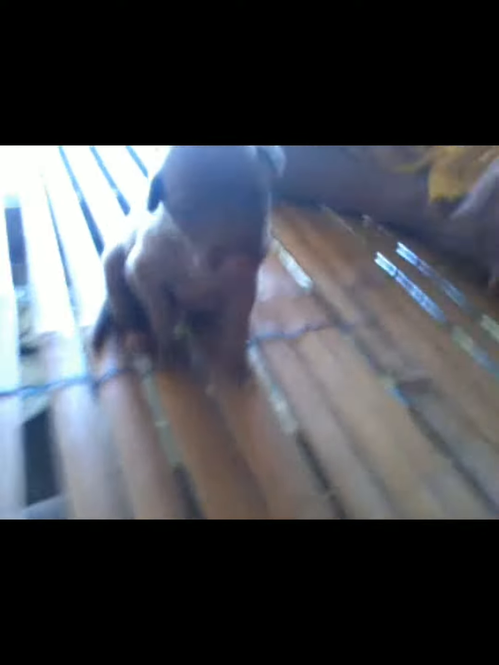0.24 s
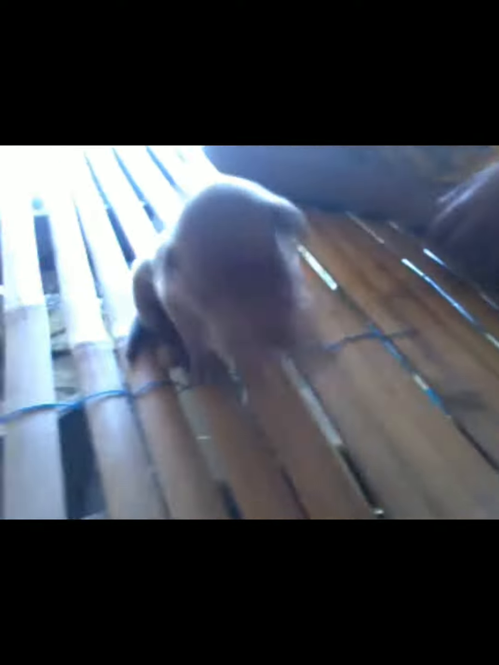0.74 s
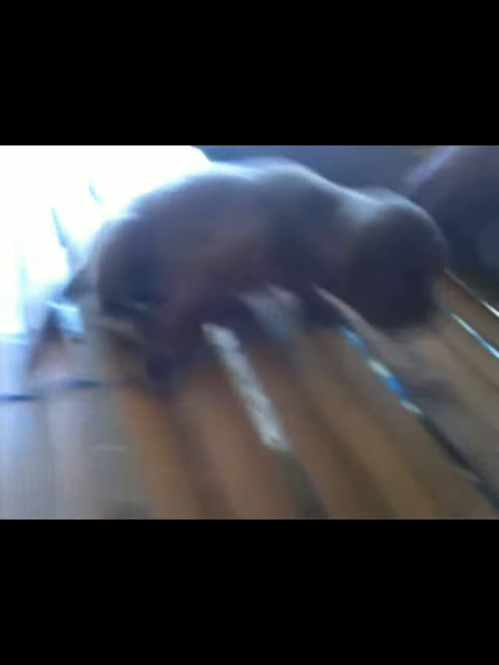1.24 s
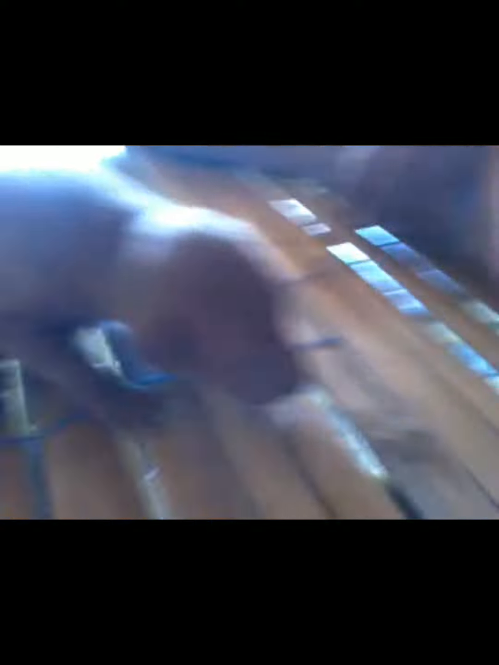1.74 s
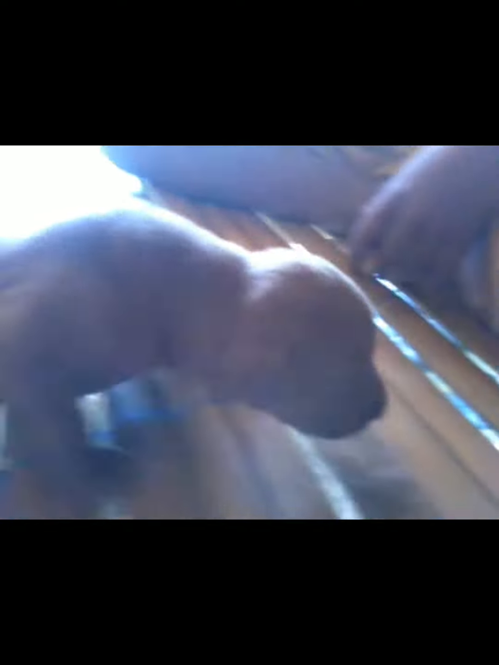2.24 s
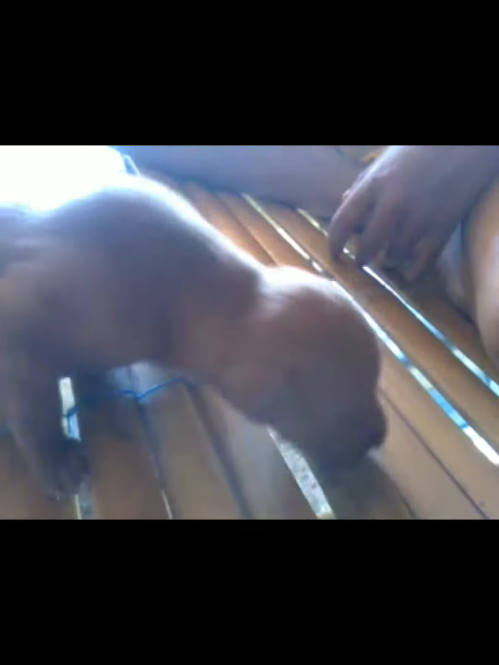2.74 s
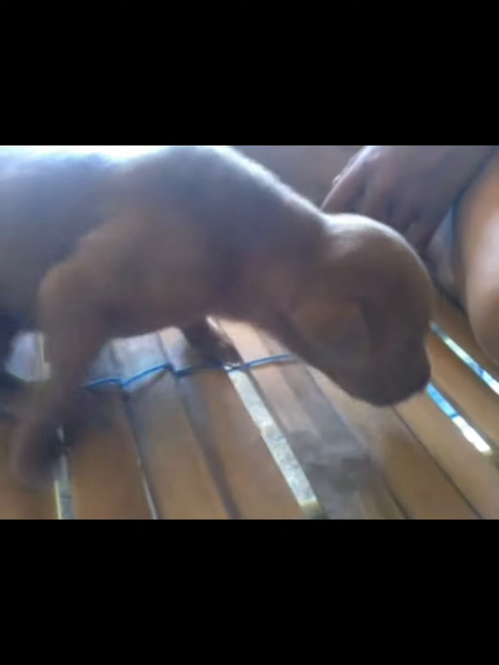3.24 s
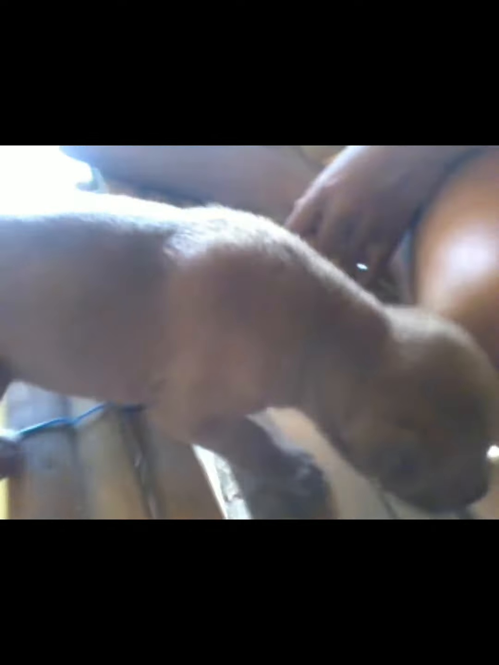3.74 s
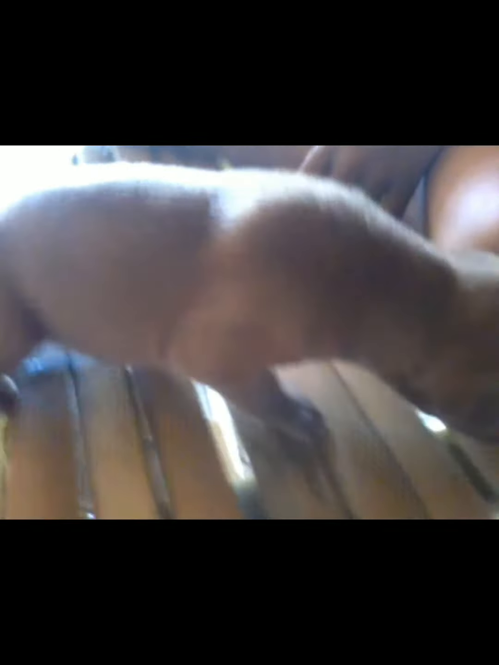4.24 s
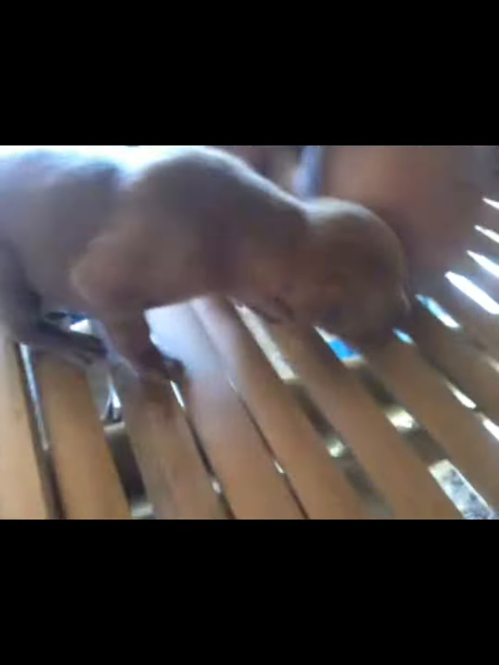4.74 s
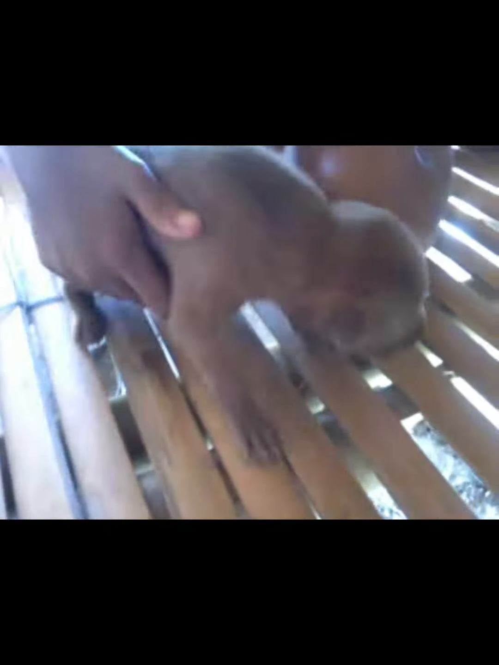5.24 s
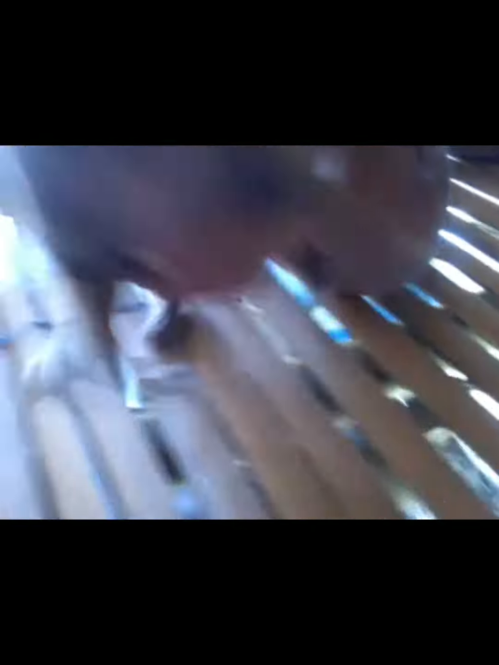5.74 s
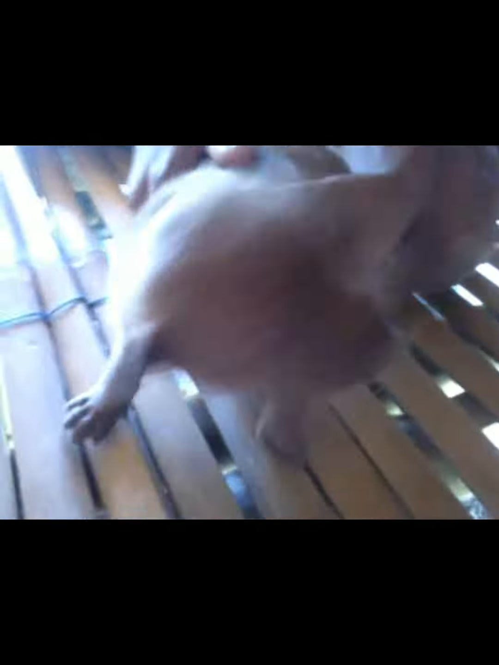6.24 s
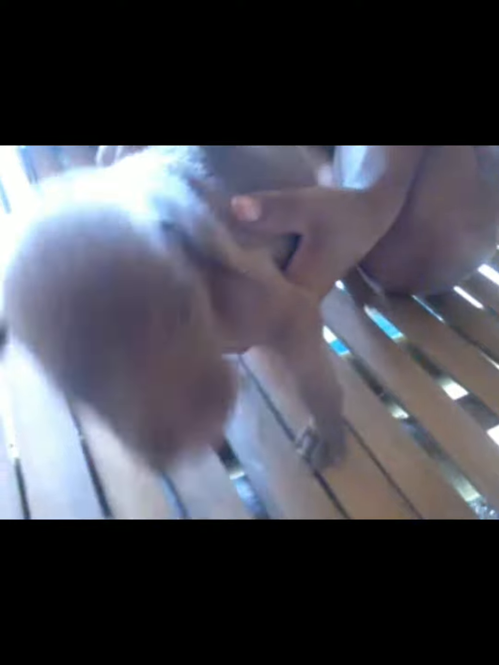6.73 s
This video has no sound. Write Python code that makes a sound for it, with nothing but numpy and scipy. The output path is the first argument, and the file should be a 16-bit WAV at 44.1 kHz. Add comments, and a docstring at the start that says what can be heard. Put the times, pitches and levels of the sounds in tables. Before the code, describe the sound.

Puppies cry on a bamboo slat floor. Quiet gliding whines and tiny regular whimpers come first, with light claw ticks, scrapes and dull bumps; a hard clack lands at two seconds. Louder cries follow in quick succession, each starting with a hoarse bark and rising thin. From five and a half seconds a lifted puppy yelps very close, shrill and clipped. Cheap phone microphone, thin bass, slight hiss, short echo.

```python
"""Puppies on a slatted bamboo floor: one whines long cries, another whimpers and grunts, and a third
yelps right at the phone when lifted and overloads it. Each voice is a stack of partials on a gliding
pitch, shaped by mouth and throat, with irregular folds and breath. Claws tick (ringing noise bursts),
paws scrape (dense clicks) and bodies bump (dull thuds) on the boards, over a steady room background."""
import sys
import numpy as np
from scipy import signal
from scipy.fft import rfft, irfft
from scipy.io import wavfile
from scipy.ndimage import uniform_filter1d

SR = 44100
rng = np.random.default_rng(int(sys.argv[2]) if len(sys.argv) > 2 else 0)


def file_out(sig):
    """Save sig as 16-bit WAV at sys.argv[1]."""
    # one column per channel
    cols = np.atleast_2d(sig).T
    # limit, then scale
    lim = np.clip(cols, -1, 1)
    pcm = np.round(lim * 32767).astype(np.int16)
    wavfile.write(sys.argv[1], SR, pcm)


N = 308700
T = np.arange(N) / SR
PHONE_RATE_HZ = 16000


def undb(db):
    """Amplitude factor of a level in dB."""
    return 10 ** (np.asarray(db) / 20)


def unit(x):
    """Scale to RMS 1."""
    return x / np.sqrt(np.mean(x ** 2))


def band(x, lo_hz, hi_hz):
    """Band-pass with gentle edges."""
    return signal.sosfilt(signal.butter(2, [lo_hz, hi_hz], "bandpass", fs=SR, output="sos"), x)


def flutter(top_hz):
    """Random wavering up to about top_hz, RMS 1."""
    return unit(signal.sosfilt(signal.butter(2, top_hz, fs=SR, output="sos"), rng.standard_normal(N)))


def curve(points):
    """Join (time_s, value) points by straight lines."""
    return np.interp(T, *np.transpose(points))


def log_interp(hz, table):
    """Read a (frequency_hz, gain_db) table on a log frequency axis."""
    table_hz, table_db = np.transpose(table)
    return np.interp(np.log(hz), np.log(table_hz), table_db)


def warble(spells):
    """Pitch factor and level change in dB: the pitch flicks up and the level shifts at each crest."""
    share, change_db = 0, 0
    for first_s, last_s, rate_hz, depth, crest_db in spells:
        on = (T > first_s - .5 / rate_hz) & (T < last_s + .5 / rate_hz)
        crest = on * np.cos(np.pi * rate_hz * (T - first_s)) ** 2
        share = share + depth * (2 * crest - on)
        change_db = change_db + crest_db * crest ** 2
    return 1 + share, change_db


def voice(calls, rough, mouth, press_db, upper_db, breath_db, size, count, waver=(1, 0)):
    """Partials on one pitch; irregular folds shake pitch and strength and let air hiss once a cycle."""
    # throat colour of the upper partials: frequency_hz, gain_db
    throat = [(1000, -8), (2000, -7.5), (2800, -17.5), (3200, -22.5), (4300, -24.5), (5500, -37),
              (7200, -32.5)]
    climb_db = 0.5  # gain per partial above the third
    upper_growth, hiss_growth = 0.13, 0.29  # extra dB per dB of effort
    rasp_hz, rasp_depth = 210, .35  # uneven beating of hoarse folds

    gate = np.zeros(N)
    for call in calls:
        gate[int(call[0][0] * SR):int(call[-1][0] * SR) + 130] = 1
    gate = uniform_filter1d(gate, size=130)

    s, pitch_hz, level_db, tilt_db = np.concatenate(calls).T
    pitch_factor, waver_db = waver
    hz = uniform_filter1d(np.interp(T, s, pitch_hz) * pitch_factor, size=130)
    jitter = .03 * np.sqrt(rough) * flutter(30) + .017 * rough * flutter(160)
    phase = 2 * np.pi * np.cumsum(hz * (1 + jitter)) / SR
    effort_db = uniform_filter1d(np.interp(T, s, level_db), size=200) + waver_db
    tilt_db = uniform_filter1d(np.interp(T, s, tilt_db), size=200)
    below_peak_db = effort_db - effort_db.max()

    # the mouth shapes the low partials; pressed folds change the third and higher
    low = []
    for k in range(1, size + 1):
        db = log_interp(k * hz, mouth) + tilt_db * np.log2(min(k, 3))
        low.append(db - (-climb_db) * max(k - 3, 0) + (k > 2) * press_db)
    low = np.array(low)
    # together the low partials carry the effort level
    levels = list(low + effort_db - 10 * np.log10(np.sum(undb(2 * low), axis=0)))

    # the throat colours the upper partials, which also thin out at high pitch
    upper = effort_db + np.minimum(press_db, 0) / 2 + upper_growth * below_peak_db
    upper = upper + upper_db - 8 * np.log2(hz / 700)
    levels += [upper + log_interp(k * hz, throat) for k in range(size + 1, count + 1)]

    uneven = flutter(50) * np.cos(phase / 2)  # strong-weak cycles: lines halfway between partials
    partials = 0
    for k, db in enumerate(levels, 1):
        shimmer = 1 + .4 * rough * flutter(200) + .8 * rough ** 2 * uneven
        audible = k * hz < PHONE_RATE_HZ / 2
        partials = partials + np.sqrt(2) * undb(db) * shimmer * np.sin(k * phase + k * k) * audible

    air = unit(band(band(rng.standard_normal(N), 600, 8100), 780, 7900)) * (1 + np.cos(phase))
    hiss = undb(breath_db + effort_db + hiss_growth * below_peak_db) * rough * air
    rasp_phase = 2 * np.pi * np.cumsum(rasp_hz * (1 + .3 * flutter(25))) / SR
    rasp = 1 + rasp_depth * rough * np.cos(rasp_phase)
    return gate * rasp * (partials + hiss)


def hoarseness(cries):
    """Long cries open clear, break into a bark, then clear again."""
    # one row per cry: bark_roughness (0-1), hold_s
    barks = [(.3, .14), (.22, .2), (.22, .32), (.75, .07), (.75, .07), (.85, .12), (.75, .06), (.75, .06),
             (.1, .05), (.45, .04)]
    onset_s, fade_s, clear_rough = .03, .08, .06
    points = []
    for cry, (rough, hold_s) in zip(cries, barks):
        s = cry[0][0] + onset_s
        points += [(s - onset_s / 2, clear_rough), (s, rough)]
        points += [(s + hold_s, rough), (s + hold_s + fade_s, clear_rough)]
    return curve(points)


def whines():
    """Long gliding cries whose folds press, bark and warble."""
    # one list per cry: time_s, pitch_hz, level_db, tilt_db_per_octave (mouth opening)
    cries = [
        [(0.0, 877, -28, -4), (0.05, 902, -30, -3.5), (0.082, 911, -23, -7), (0.106, 899, -29, -6.5),
         (0.17, 938, -27, -1), (0.222, 892, -30.5, -9), (0.24, 802, -37.5, -8), (0.266, 692, -40, 5.5),
         (0.32, 564, -56.5, -19)],
        [(0.93, 404, -67, -40), (1.07, 423, -64, -34), (1.09, 412.4, -41, -13), (1.12, 458.5, -33.5, -17),
         (1.155, 504, -35, -7), (1.19, 532, -36.5, -2), (1.23, 569, -38, -3), (1.3, 650, -37.5, -5.5),
         (1.35, 846, -36.5, -5), (1.378, 829, -33, -14), (1.444, 949, -31.5, -3), (1.564, 993, -37.5, -6),
         (1.674, 964, -38, -1), (1.72, 882, -31.5, -5), (1.75, 902, -28, -1), (1.775, 945, -30.5, -3.5)],
        [(2.29, 450, -57, -9), (2.312, 603, -28.5, 6), (2.33, 688, -20.5, 13.5), (2.398, 759, -18, 22.5),
         (2.43, 837, -23, 16.5), (2.45, 1080, -32, 9), (2.476, 946, -20.5, 9.5), (2.49, 1096, -31, 11),
         (2.51, 890, -22, 3), (2.53, 1063, -26, 13), (2.59, 1209, -30.5, 5.5), (2.602, 1017, -26, 17),
         (2.618, 1348, -27, -9), (2.65, 1332, -27, -8), (2.682, 1328, -23, -6), (2.712, 1297, -41, 1.5),
         (2.75, 1180, -33.5, 4), (2.832, 940, -35.5, -2), (2.884, 911, -36, -8), (2.95, 793, -53.5, -10)],
        [(3.308, 449, -48, -14), (3.326, 578.5, -31.5, 2), (3.342, 687, -22.5, 9.5), (3.353, 800, -25, 9),
         (3.361, 920, -17.5, 25), (3.374, 872, -15, 10), (3.39, 883, -18, 16), (3.406, 778.5, -17.5, 17),
         (3.45, 767, -29, 17), (3.474, 969, -26.5, 2), (3.49, 1000, -22.5, 13), (3.52, 978, -22.5, 7.5),
         (3.54, 1024, -20.5, 17.5), (3.592, 1138, -27, 10), (3.604, 1380, -24.5, -6), (3.642, 1378, -31.5, 8.5),
         (3.718, 1375, -38, 1.5), (3.744, 1295, -44, -3), (3.79, 1117, -46, 5)],
        [(3.991, 513, -45, -7), (4.003, 604, -31.5, -1), (4.017, 712.5, -21.5, 15.5), (4.027, 917, -21, 6.5),
         (4.05, 957, -19.5, 5), (4.078, 896, -16.5, 15.5), (4.104, 837.5, -24, 12), (4.12, 957, -27.5, 4.5),
         (4.146, 948, -23, 12), (4.17, 1336, -38.5, 1), (4.188, 1070, -28, 16), (4.22, 1342, -36, 4.5),
         (4.272, 1345, -36, 5), (4.306, 1250, -44.5, 4), (4.345, 1218, -62, -3)],
        [(4.562, 466, -46, -19), (4.572, 580.4, -34, -10), (4.586, 669, -24, 10.5), (4.596, 924, -22, 6),
         (4.62, 1006, -17.5, 17), (4.644, 1013, -20, 11), (4.662, 868, -19, 11.5), (4.678, 817, -26, 9),
         (4.7, 1015, -31, 9.5), (4.734, 1076, -31.5, 5), (4.802, 1087, -32, 8), (4.822, 1341, -26.5, -11),
         (4.9, 1382, -35.5, 0.5), (4.964, 1363, -39, -5), (4.994, 1174, -42, 6.5), (5.04, 1071, -50, 4)],
        [(5.232, 495.5, -33, 14), (5.244, 610, -35, -3), (5.258, 671, -24.5, 8), (5.272, 947, -18.5, 5.5),
         (5.29, 974, -19, 6.5), (5.314, 818, -20.5, 11), (5.35, 739, -30.5, 5), (5.362, 800, -26, -7),
         (5.39, 822, -39.5, -3), (5.404, 919, -29, -8.5), (5.452, 951, -36.5, -2.5), (5.535, 1170, -44.5, 12)],
        [(5.83, 607, -28, 9), (5.85, 940, -18.5, 6), (5.875, 933, -16.5, 10), (5.905, 940, -17.5, 7.5),
         (5.918, 776, -26, 8), (5.952, 763, -31, 8), (5.98, 891, -32, -6)],
        [(6.09, 1070, -44, -35), (6.11, 1026, -27.5, 15), (6.182, 1110, -34, 12), (6.24, 1170, -43.5, 7.5),
         (6.27, 1053, -55, 2)],
        [(6.865, 512, -29, -4), (6.889, 764, -23, 6.5), (6.905, 904, -14.5, 8.5), (6.923, 977, -17.5, 6.5),
         (6.95, 943, -20, 5), (6.983, 978, -31.5, -6), (7.0, 804, -48, -11.5)],
    ]
    # how hard the folds close, acting from the third partial up: time_s, press_db
    fold_press = [(0, -3.5), (0.2, -3), (0.24, -4), (0.27, -7), (0.32, -2), (1.08, -9), (1.16, -1.5),
                  (1.23, -4), (1.29, 7), (1.36, -6), (1.74, -33), (1.76, 16), (2.3, -8), (2.4, -12),
                  (2.44, -36), (2.58, -47), (2.63, 6), (2.75, -9), (2.8, -27.5), (3.1, 19), (3.33, -5),
                  (3.35, -2.5), (3.4, -9.5), (3.44, -9.5), (3.48, -22), (3.55, -38), (3.6, -9.5),
                  (3.79, -6.5), (4.01, -6), (4.035, -0.5), (4.08, -3), (4.12, -16), (4.17, -27), (4.3, 1),
                  (4.58, 3), (4.62, -12), (4.7, -2), (4.81, -12), (4.84, 4), (5.03, -7), (5.25, -5),
                  (5.28, 1.5), (5.31, -1), (5.33, -9), (5.37, 4), (5.45, -5), (5.53, -5), (5.85, -1.5),
                  (5.98, -7), (6.18, -29), (6.25, -14.5), (6.88, 4.5), (6.93, -12), (7, -8)]
    # warbling spells: first_crest_s, last_crest_s, rate_hz, depth (share of pitch), crest_db
    spells = [(0.035, 0.162, 25, .04, -8.5), (1.126, 1.297, 23, .03, -5.5), (3.499, 3.581, 29.7, 0.019, -3),
              (4.695, 4.801, 22, 0.019, -3.5), (4.926, 5.018, 22, 0.019, -4.5)]
    # mouth resonances: frequency_hz, gain_db
    mouth = [(400, -41), (700, -1.5), (1000, 0), (1400, -3.5), (1900, 4), (2300, -9), (2750, -6.5),
             (3200, -26.5), (4000, -16), (5500, -23.5)]
    return voice(cries, hoarseness(cries), mouth, curve(fold_press), upper_db=6,
                 breath_db=-33.5, size=4, count=9, waver=warble(spells))


def swells(events, rise_db_s, stop_s):
    """Each event rises to its level, fades at its own pace and stops."""
    out = 0
    for s, db, fade_db_s in events:
        t = T - s
        fall_db = -fade_db_s * t - rise_db_s * np.maximum(t - stop_s, 0)
        out = out + undb(db + np.where(t < 0, rise_db_s * t, fall_db))
    return out


def clicks(rate_hz, spread_db):
    """Random tiny clicks of uneven size."""
    struck = rng.random(N) < rate_hz / SR
    return struck * undb(spread_db * rng.exponential(size=N)) * rng.standard_normal(N)


def scrape():
    """Paws scraping: dense tiny clicks in the bright band of the slats."""
    # peak_s, level_db, fade_db_per_s
    strokes = [(0.0, -46, 208), (0.2, -61, 28), (0.304, -53.5, 57), (0.45, -51.5, 37), (0.74, -52.5, 64),
               (0.84, -57, 200), (1.1, -43, 125), (1.22, -57.5, 18), (1.42, -52, 98), (1.48, -36.5, 1795),
               (1.51, -52, 50), (1.55, -41, 700), (1.756, -28.5, 652), (2.012, -67, 700),
               (2.035, -40.5, 58), (4.36, -97, 400), (4.45, -73, 1500), (4.72, -46.5, 76),
               (5.038, -48, 500), (5.095, -42.5, 300), (5.18, -63.5, 67), (6.495, -51.5, 400)]
    grains = band(band(clicks(5000, 2.2), 3300, 5700), 3300, 5700)
    return swells(strokes, rise_db_s=2493, stop_s=0.13) * unit(grains)


def bumps():
    """Soft bumps through the floor: dull grainy thuds in the boards' low resonance."""
    # peak_s, level_db, fade_db_per_s
    thuds = [(0.0, -37, 270), (0.106, -38.5, 503), (0.3, -48.5, 700), (0.42, -44, 200), (0.49, -46, 600),
             (0.57, -55.5, 67), (0.625, -54, 600), (0.75, -34, 502), (0.8, -72, 200), (0.9, -60, 102),
             (1.226, -40, 450), (1.454, -45, 150), (1.568, -51, 400), (1.766, -32.5, 324),
             (2.016, -43.5, 46), (2.21, -57, 342), (3.52, -50, 501), (6.39, -49, 902), (6.428, -55, 1203)]
    return swells(thuds, rise_db_s=593.5, stop_s=.15) * unit(band(clicks(600, 2.5), 336, 1070))


def room():
    """Steady background of shaped noise that drifts a little in level."""
    # relative noise spectrum: frequency_hz, density_db
    spectrum = [(88, -39), (150, -35), (242, -52.5), (439, -15.5), (1240, -21), (2800, -17), (3040, -19.5),
                (4370, -21.5), (5700, -23), (7800, -60.5), (10100, -35.5), (17200, -120)]
    shape = undb(log_interp(np.arange(N // 2 + 1) * SR / N + 1, spectrum))
    noise = unit(irfft(rfft(rng.standard_normal(N)) * shape, N))
    return undb(-58.5 + 0.3 * flutter(9)) * noise


def ticks():
    """Claws striking the slats: a short ring of the slat and a crackly tail."""
    # start_s, peak_db, centre_hz, tail_t60_s
    strikes = [(0.046, -33, 3450, 0.24), (0.304, -35.5, 4450, 0.016), (0.7397, -31.5, 2723, 0.014),
               (0.968, -45, 3117, 0.027), (1.4211, -32, 2917, 0.027), (1.4858, -45, 4166, 0.02),
               (1.5494, -19, 3650, 0.032), (1.7579, -11.5, 2900, 0.018), (1.8547, -41, 3194, 0.04),
               (2.0139, -1, 3910, 0.016), (2.027, -53, 4030, 0.02), (2.0676, -9, 4210, 0.015),
               (2.1165, -30, 3830, 0.027), (2.168, -25, 3440, 0.048), (3.7296, -27, 4010, 0.028),
               (4.358, -39, 3210, 0.034), (4.4456, -26.5, 2584, 0.013), (4.6372, -15.5, 3667, 0.031),
               (5.1052, -28, 3302, 0.042), (6.493, -33, 3140, 0.025), (6.815, -26.5, 2900, 0.052)]
    out = np.zeros(N)
    t = T[:3000]
    for s, db, hz, t60_s in strikes:
        crack = band(rng.standard_normal(len(t)), 0.75 * hz, min(1.145 * hz, 9000))
        hit = crack * (undb(-60 * t / (0.11 * t60_s)) + 0.53 * undb(-60 * t / t60_s))
        i = int(s * SR)
        out[i:i + len(t)] += undb(db) * hit / np.abs(hit).max()
    return out


def whimper(s, length_s, first_hz, top_hz, last_hz, rise, db, tilt_db):
    """The pitch moves to its top while the voice swells and the mouth closes slightly, then drifts on."""
    attack_s, release_s = min(0.018, length_s / 4), min(0.0098, length_s / 4)
    swell_db, edge_db, open_db = -2.5, -20.5, 0.5
    hook = 0.95  # share of the last pitch left as the whimper dies
    top_s = np.clip(rise * length_s, 2 * attack_s, length_s - 2 * release_s)
    times = np.array([0, attack_s, top_s, length_s - release_s, length_s])
    hz = np.interp(times, times[[0, 2, 3, 4]], [first_hz, top_hz, last_hz, hook * last_hz])
    level_db = db + np.array([2 * swell_db, swell_db, 0, 0, 2 * edge_db])
    tilt_db = tilt_db + np.interp(times, times[[0, 2]], [open_db, 0])
    return np.transpose([s + times, hz, level_db, tilt_db])


def whimpers():
    """Short breathy whimpers and grunts from a small mouth."""
    # start_s, length_s, first_hz, top_hz, last_hz, rise (share of length), level_db, tilt_db_per_octave
    rows = [(0.049, .13, 780, 1126, 950, 0.83, -34, -8.5), (0.387, 0.15, 540, 1115, 1085, 0.63, -40, -12),
            (0.717, 0.15, 807, 1378, 1380, 0.54, -39, -15), (1.034, 0.15, 942, 1470, 980, 0.8, -33, -12),
            (1.358, 0.14, 760, 879, 950, .75, -30.5, -14.5), (1.631, .11, 539, 756.6, 900, 0.63, -34, -10),
            (1.929, .115, 772, 1052, 990, 0.9, -27, -12), (2.168, 0.14, 618, 886, 785, 0.83, -29.5, -11),
            (2.445, .14, 591.5, 913, 705, 0.62, -31, -8), (2.742, 0.069, 488.4, 551, 640, 0.57, -33.5, -11),
            (2.848, 0.023, 808, 757, 770, 0.66, -37, -10.5),
            (3.037, 0.13, 480, 846, 785, 0.6, -31.5, -10.5), (3.328, 0.053, 418, 476, 560, 0.51, -30.5, -9),
            (3.556, .075, 361.5, 616, 670, 0.7, -34, -8),
            (3.808, 0.058, 315.4, 327, 420, 0.53, -37.5, -15.5),
            (4.038, 0.037, 330, 330, 332, 0.37, -41.5, -12),
            (4.247, 0.061, 314.6, 337.5, 420, 0.75, -37, -12),
            (4.478, 0.051, 385, 505, 560, 0.61, -35, -14), (4.682, 0.066, 537, 560, 700, 0.6, -35, -7),
            (5.116, 0.055, 499, 548, 780, 0.35, -33.5, -8.5)]
    # warbling spells: first_crest_s, last_crest_s, rate_hz, depth (share of pitch), crest_db
    spells = [(0.1, .18, 25.5, .03, -9.5), (1.07, 1.17, 30.15, .04, -6), (1.39, 1.47, 27.88, .04, -3),
              (2.2, 2.28, 30.06, .04, 3.5), (2.49, 2.56, 27.2, .03, 4.5), (3.07, 3.15, 27.22, .05, 2)]
    # mouth resonances: frequency_hz, gain_db
    mouth = [(330, -27.5), (500, -20), (700, -0.5), (900, 0), (1200, -5.5), (1600, 0), (2000, 8),
             (2750, 3.5), (3500, -1), (4400, -13)]
    return voice([whimper(*row) for row in rows], .24, mouth, press_db=-4, upper_db=-9,
                 breath_db=-11.5, size=3, count=7, waver=warble(spells))


def yelps():
    """Loud yelps close to the phone, with nearly regular folds."""
    # one list per yelp: time_s, pitch_hz, level_db, tilt_db_per_octave (mouth opening)
    cries = [
        [(5.53, 995.6, -33, -45), (5.545, 1001, -20.5, 1.5), (5.552, 1000, -3.5, 3.5), (5.578, 1188, 7.5, 19.5),
         (5.6, 1323, 1, 15), (5.616, 1385, -4, 1.5), (5.621, 1573, 8, 12.5), (5.694, 1533, 4.5, 14),
         (5.735, 1506, 7.5, 10), (5.78, 1475, 5.5, 22.5), (5.8, 1431, 5.5, 18), (5.816, 1466, -2.5, 10),
         (5.83, 1410, -18.5, 3)],
        [(5.97, 1327, -41.5, 15), (5.984, 1305, -10, 3.5), (6.014, 1408, 2.5, 9), (6.042, 1648, 3, -3.5),
         (6.066, 1643, -2, -14), (6.075, 1445, -10.5, -11), (6.102, 1478, -15.5, -2), (6.122, 1604, -15.5, -7),
         (6.166, 1668, -20, -9), (6.235, 1601, -17.5, -22), (6.261, 1659, -27, -12.5),
         (6.325, 1689, -17.5, -16), (6.335, 1510, -22.5, -22.5), (6.345, 1435, -25, -24.5),
         (6.355, 1341, -69, -11.5)],
        [(6.535, 1190, -32, -23), (6.543, 1100, -4.5, 4), (6.551, 991, -4, 15), (6.572, 1068, 7, 9.5),
         (6.595, 1126, 5, 10), (6.613, 1190, 5.5, 20.5), (6.634, 1277, -6, 21), (6.639, 1421, 0.5, 7),
         (6.655, 1425, -3, 5), (6.672, 1423, -18, -8), (6.713, 1495, -20, -18), (6.73, 1519, -18.5, -21.5),
         (6.774, 1546, -22.5, -18), (6.796, 1540, -20.5, -22), (6.834, 1425, -25, 0), (6.866, 1391, -19.5, 2),
         (6.875, 1452, -10.5, -6), (6.914, 1494, -8, 0.5), (6.945, 1548, -19.5, -8.5),
         (6.974, 1590, -20, -14.5), (6.986, 1540, -19, -14), (7.0, 1370, -36, -10)],
    ]
    # how hard the folds close, acting from the third partial up: time_s, press_db
    fold_press = [(5.55, -1.5), (5.58, 0), (5.61, 30), (5.625, -0.5), (5.7, 3.5), (5.74, -25.5),
                  (5.77, -20.5), (5.795, -30.5), (5.82, -6.5), (5.985, 1.5), (6.015, 1), (6.045, 17.5),
                  (6.07, 18), (6.09, -6), (6.12, 6), (6.17, 7.5), (6.235, 4.5), (6.33, 14), (6.535, -23.5),
                  (6.55, 2), (6.575, 4), (6.595, -8.5), (6.612, -26), (6.63, -13), (6.67, 0.5), (6.7, 15.5),
                  (6.725, 25), (6.74, 13), (6.79, 20.5), (6.84, 2.5), (6.88, 6.5), (6.92, -2.5), (6.98, 14)]
    # mouth resonances: frequency_hz, gain_db
    mouth = [(1000, -17), (1500, -1), (2200, 11), (3000, 5.5), (3700, -5.5), (4600, -4.5), (5600, -15.5),
             (7500, -20)]
    return voice(cries, .008, mouth, curve(fold_press), upper_db=1, breath_db=14.5, size=5, count=5)


def echo(x):
    """Short diffuse reverberation: convolution with decaying noise."""
    t60_s, level_db = .1, -16
    tail = rng.standard_normal(8000) * undb(-60 * T[:8000] / t60_s)
    return undb(level_db) * signal.fftconvolve(x, tail / np.sqrt(np.sum(tail ** 2)))[:N]


def scene():
    """Puppies and floor sounds with their echo, over the room."""
    near = whines() + scrape() + bumps() + ticks() + whimpers() + yelps()
    return (near + echo(near) + room())[None]


def record(dry):
    """The phone cuts bass, samples slowly and clips, folding overload tones down; the output clips again."""
    mic_low_hz, mic_top_hz, phone_band_hz, top_hz = 314, 6793, 7300, 15600
    x = signal.sosfilt(signal.ellip(5, .5, 45, mic_low_hz, "highpass", fs=SR, output="sos"), dry)
    x = signal.sosfilt(signal.butter(8, mic_top_hz, fs=SR, output="sos"), x)
    slow = signal.resample_poly(x, PHONE_RATE_HZ // 100, SR // 100, axis=1)
    slow = np.clip(slow, -.74, .7)
    slow = signal.sosfilt(signal.butter(1, phone_band_hz, fs=PHONE_RATE_HZ, output="sos"), slow)
    x = signal.resample_poly(slow, SR // 100, PHONE_RATE_HZ // 100, axis=1)[:, :N]
    # faint low circuit noise lies under everything
    rumble = undb(-86.5) * unit(band(rng.standard_normal(N), 40, 250))
    x = np.clip(x + rumble, -.99, .99)
    return signal.sosfilt(signal.ellip(8, .2, 70, top_hz, fs=SR, output="sos"), x)


dry = scene()
out = record(dry)
file_out(out)
```